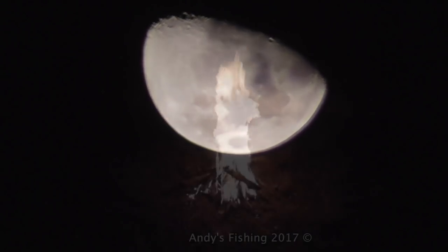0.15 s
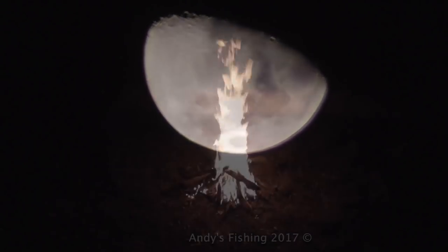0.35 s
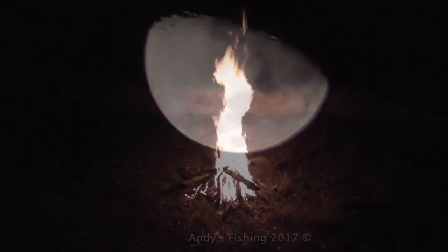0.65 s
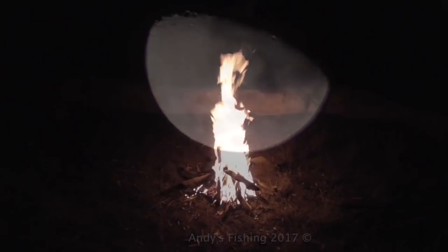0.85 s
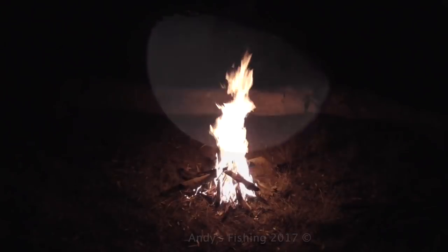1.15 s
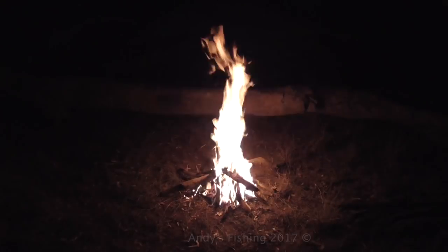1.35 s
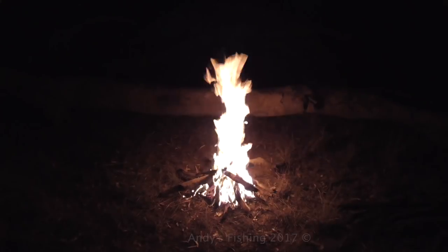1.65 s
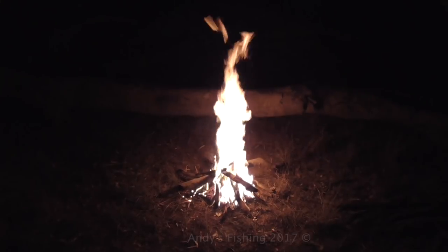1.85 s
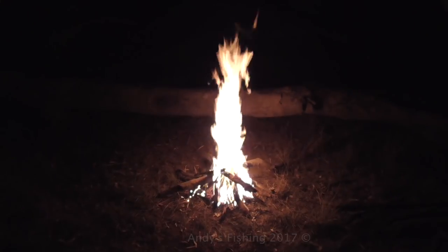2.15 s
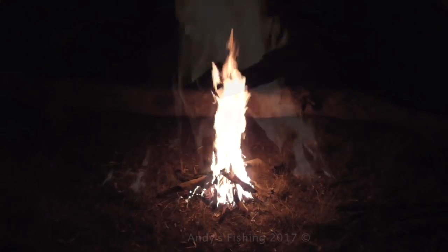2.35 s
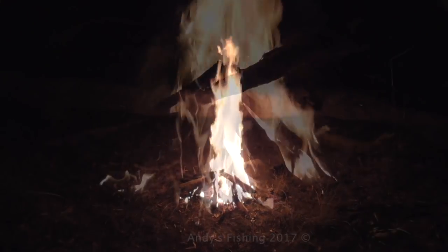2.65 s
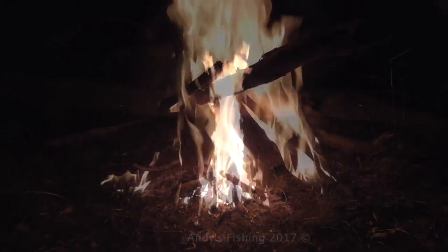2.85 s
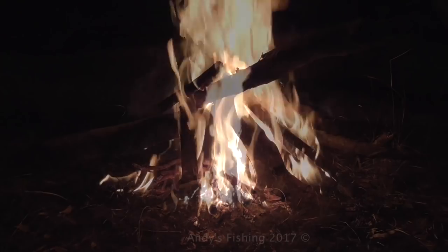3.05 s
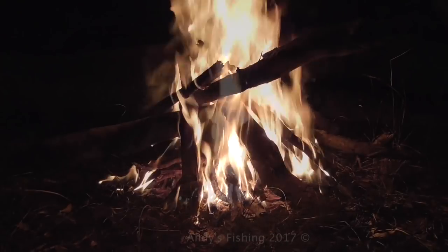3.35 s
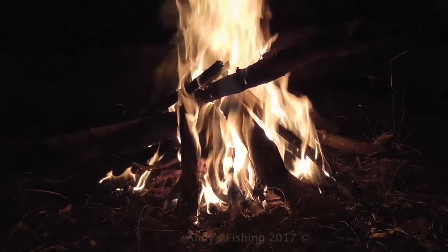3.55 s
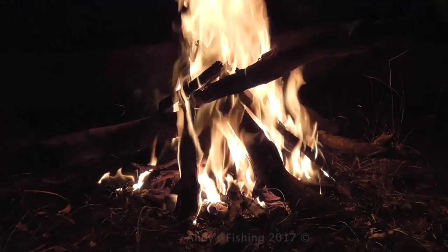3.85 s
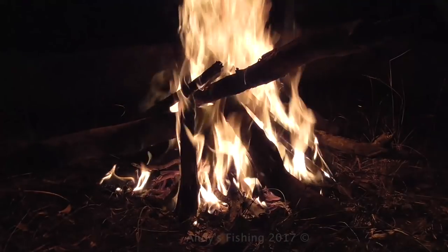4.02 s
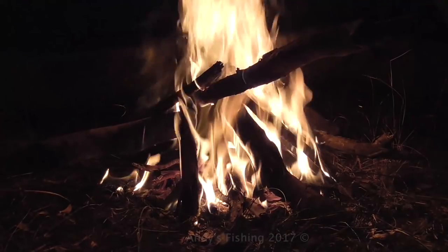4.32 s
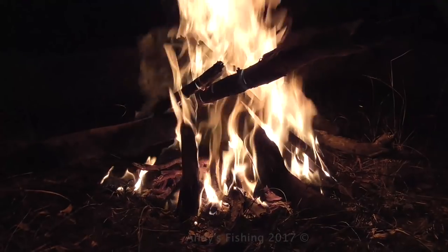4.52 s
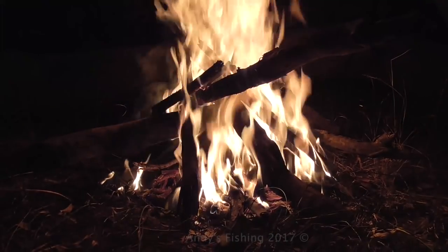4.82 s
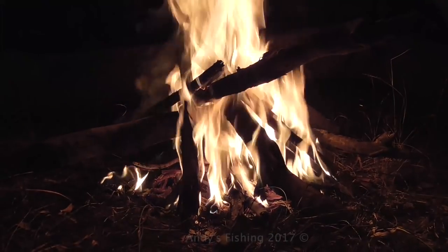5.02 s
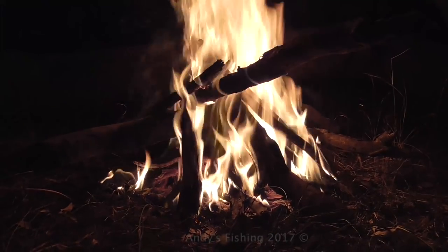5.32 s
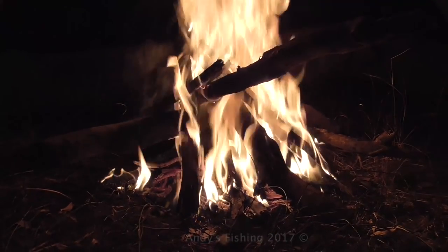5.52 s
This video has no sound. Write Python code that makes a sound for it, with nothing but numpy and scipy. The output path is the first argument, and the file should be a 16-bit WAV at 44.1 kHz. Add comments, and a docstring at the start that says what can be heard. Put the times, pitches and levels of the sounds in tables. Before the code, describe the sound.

Outdoors at night, thin cricket notes and a merged chorus open very quietly with a faint hollow drone. A high pulsed trill and near falling chirps join, swelling over the first second as a small fire fades in. From about 2.6 seconds the listening point cross-fades beside the fire: low fluttering roar, sizzle and crackles slightly right, crickets receding, one sharp pop at 4 seconds.

```python
"""Crickets in the dark first: thin held notes, a merged chorus and a faint hollow drone, with a fire faint behind.
A high pulsed trill and a near cricket's falling chirps join: wing strokes drawn as pitch-swept sines.
The listening spot cross-fades from the dark to a few steps from a campfire of sticks, then right beside it.
Flames flutter and roar and wood sizzles (coloured noise); twigs tick and cells crackle (resonant noise bursts).
One steam pocket bursts with a sharp pop: a pressure pulse and the decaying ring of the stick."""
import sys
import numpy as np
from scipy import signal
from scipy.fft import rfft, irfft, next_fast_len
from scipy.io import wavfile
from scipy.ndimage import uniform_filter1d, map_coordinates

SR = 44100
rng = np.random.default_rng(int(sys.argv[2]) if len(sys.argv) > 2 else 0)


def persist_wave(psi):
    """Save psi, clipped to +-1, as 16-bit WAV."""
    counts = np.round(np.clip(psi, -1, 1) * 32767).astype(np.int16)
    wavfile.write(sys.argv[1], SR, np.atleast_2d(counts).T)


N = 250488
T = np.arange(N) / SR
TOP_HZ = 15500

# cross-fades from dark to few steps, and from few steps to beside the fire: start_s, end_s
APPROACH_S, CLOSE_IN_S = (0.185, 1.324), (2.598, 3.477)

# layer levels at the three spots: dark_db, few_steps_db, beside_db
CHORUS_DB = (-49.5, -40.5, -45)
CROWD_DB = (-53, -42.5, -48.5)
MURMUR_DB = (-56, -50.5, -52.5)
ROAR_DB = (-69, -43, -34)
SIZZLE_DB = (-58, -54, -53.5)
CHIRP_DB = (-55.5, -34.5, -50.5)
DRONE_DB = -49  # dark spot only

# held notes of tree crickets: start_s, end_s, pitch_hz, level_db, left_over_right_db, pulse_depth (0-1)
HELD_NOTES = [(-.1, .93, 3818, -52.5, 4, 0.5), (-.1, .93, 3673, -56, -1, 0.67),
              (2.208, 2.777, 3744, -52.5, -3.5, 0.26), (2.21, 2.781, 3570, -57, -12.5, 0.57)]
# spectrum of the furthest crickets: freq_hz, density_db (per Hz, relative)
CHORUS_SPECTRUM = [(2700, -48.5), (3100, -19.5), (3370, -3), (3520, -10), (3750, -8), (3950, -8),
                   (4200, 1.5), (4450, 5.5), (4750, 3.5), (4950, -7), (5200, -27.5), (5700, -42.5)]
# spectrum of the night air: freq_hz, density_db (per Hz, relative)
MURMUR_SPECTRUM = [(100, -1.5), (300, 1.5), (620, 3), (950, -1), (1200, -8), (1490, 5), (1720, -7),
                   (2100, -4.5), (2700, -11), (3200, -6), (5500, -17.5), (9000, -27.5)]
# spectrum of the hollow drone: freq_hz, density_db (per Hz, relative)
DRONE_SPECTRUM = [(250, -27.5), (450, 5.5), (640, -10), (860, 3), (1150, -13.5), (1900, -34.5), (2230, -2),
                  (2800, -24), (3200, 0), (4500, -1), (6000, -27)]
# left-right likeness of the night sounds: freq_hz, correlation (0-1)
NIGHT_ALIKE = [(200, 0.047), (700, 0.324), (4500, 0.362)]

# flame roar heard beside the fire: freq_hz, density_db (per Hz, relative)
NEAR_ROAR_SPECTRUM = [(20, -36.5), (40, -14.5), (70, -5.5), (130, 1.21), (175, 1), (260, -7), (370, -3),
                      (500, -13), (750, -20.5), (1100, -27), (2000, -42), (5000, -69.5)]
# flame roar heard from the other two spots: freq_hz, density_db (per Hz, relative)
FAR_ROAR_SPECTRUM = [(20, -31), (60, -7.5), (120, -5), (180, 1.5), (250, -1), (350, -7), (450, -15.5),
                     (650, -16), (1100, -23.5), (3000, -43.5)]
# boiling sap: freq_hz, density_db (per Hz, relative)
SIZZLE_SPECTRUM = [(1500, -15), (2700, -9.5), (5400, -5.5), (6200, -1), (7300, -3.5), (9000, 0),
                   (11500, -2), (13500, -3), (15500, -11.5)]
# left-right likeness of the fire: freq_hz, correlation (0-1)
FIRE_ALIKE = [(150, 1), (350, 0.927), (700, 0.846), (2000, 0.12), (12000, 0.0134)]
# moments when the flames flare up or sink back: time_s, swell_db
PUFFS = [(1.331, -10.5), (2.47, -9.5), (3.52, -1), (4.15, 0.5), (4.26, -3), (4.545, 3.5), (4.59, -3.5),
         (5.229, 7), (5.53, 3)]
PUFF_HALF_WIDTH_S = 0.01495
TICK_DB, TICK_SPREAD_DB = 6.5, 6.5  # faintest tick over the sizzle; strongest over faintest

# phrases of the high cricket: start_s (after the lead-in), length_s, level_db (relative)
TRILL_PHRASES = [(0.264, 0.1923, -41.5), (0.728, 0.134, -44.5), (0.878, 0.0764, -49.5),
                 (1.041, 0.0244, -50), (1.171, 0.0704, -47), (1.333, 0.094, -45.5), (1.522, 0.092, -46.5),
                 (1.736, .084, -46), (1.951, 0.082, -46), (2.149, 0.0896, -43.5), (2.362, 0.0857, -44),
                 (2.602, 0.092, -45.5), (4.639, 0.087, -60.5), (4.854, 0.087, -61), (5.079, .1, -61.5),
                 (5.322, 0.104, -59)]
# scrape of its file around the tone: freq_hz, density_db (per Hz, relative)
RASP_SPECTRUM = [(5000, -40.5), (5900, 10), (6500, -4), (7300, 7), (8000, -9), (9500, -24.5), (13000, -17),
                 (15000, -27.5)]
RASP_DB = -16.5
TRILL_SWELL_S = 0.075  # soft lead-in of a phrase

# bouts of the nearest cricket: start_s, end_s, chirp_period_s, strokes_per_chirp, level_db (relative)
CHIRP_BOUTS = [(.449, .54, .066, 1, 0), (.611, 1.4, .177, 3, 0), (1.493, 1.55, .177, 2, 1),
               (1.611, 1.83, .061, 1, 1), (1.906, 2.7, .179, 3, 0), (2.757, 2.98, .062, 1, 1),
               (3.034, 5.6, .177, 3, 0)]
STROKE_GAP_S, STROKE_SPREAD_DB = 0.04, 0.6  # within a chirp; from stroke to stroke
STROKE_S, OPENING_STROKE_S = 0.082, 0.05  # median lengths; a multi-stroke chirp opens with the quicker one
STROKE_BEND = 0.28  # the tone drops fast at first, then levels out

# bursting wood cells: time_s, level_db (relative), ring_hz, ring_sharpness, knock_db (relative)
CRACKLES = [(1.102, -35.5, 9000, 2, 5), (1.3105, -32.5, 9140, 4.1, -18.5), (2.1314, -32.5, 9000, 2.6, -0.5),
            (2.2136, -25.5, 11750, 2.9, -31), (3.172, -35, 8400, 2.5, -19.5),
            (3.1963, -32.5, 11500, 3.1, -17.5), (3.226, -30, 12500, 2.06, -20),
            (3.338, -41.5, 8150, 2.7, -20), (3.3464, -19.5, 10280, 2.7, -7.5),
            (3.434, -21.5, 10830, 4.3, -26), (3.512, -39, 9800, 6, -26), (3.6363, -18, 9100, 4.5, -2),
            (3.6825, -24, 8400, 1.12, -6), (3.8776, -23.5, 9800, 2.1, -4.5), (3.925, -34, 9800, 3, -20.5),
            (3.968, -37.5, 11100, 4, -20), (4.006, -31, 9800, 2, -26), (4.0081, -28, 8900, 3.9, -26),
            (4.033, -27.5, 11000, 3.6, -21), (4.1985, -28, 8820, 9, -25.5), (4.2265, -33, 10000, 3.5, 1),
            (4.3599, -28, 6960, 1.62, 7), (4.4175, -29.5, 8920, 4.8, -2.5), (4.471, -27, 8500, 2.4, 4.5),
            (4.6343, -31, 9560, 6.8, -6.5), (4.728, -26.5, 6900, 2.06, -12),
            (4.9412, -28, 10450, 6.7, -5.5), (5.05, -39.5, 10100, 4, -20.5), (5.108, -39, 10300, 4, -20),
            (5.202, -27, 8300, 1.8, -15), (5.2075, -32.5, 11000, 4.6, -20.5),
            (5.241, -38.5, 9200, 4.1, -20), (5.404, -37, 10500, 4, -20.5), (5.4199, -34, 9300, 3, -8),
            (5.6257, -20, 9000, 4.1, -27)]
# colour shared by all snaps: freq_hz, gain_db
SNAP_COLOUR = [(2500, -2), (4500, 2.5), (5500, 4), (6600, -4.5), (8200, -1), (11000, -0.5), (13300, -4.5),
               (15500, -10)]
# ringing modes of the stick that pops: mode_hz, level_db (relative), t60_s
STICK_MODES = [(353, -12, 0.0154), (726, -39, 0.0051), (4310, -34, 0.015), (5450, -3, 0.00137),
               (9100, -12.5, 0.00307), (13230, -22.5, 0.00265)]


def amp(db):
    """Decibels to gain."""
    return 10 ** (np.asarray(db) / 20)


def unit(x):
    """Scale to rms 1."""
    return x / np.sqrt(np.mean(x ** 2) + 1e-20)


def along(points, hz):
    """Interpolate (Hz, value) points on a log-frequency axis."""
    freq_hz, value = np.transpose(points)
    return np.interp(np.log(hz + 1), np.log(freq_hz), value)


def wobble(rate_hz):
    """A smooth random curve with rate_hz knots a second."""
    knots = rng.standard_normal(int(N * rate_hz / SR) + 4)
    return map_coordinates(knots, [T * rate_hz])


def filtered(x, response):
    """Apply a response of frequency to x."""
    size = next_fast_len(N + 8192)
    freq_hz = np.fft.rfftfreq(size, 1 / SR)
    return irfft(rfft(x, size) * response(freq_hz), size)[..., :N]


def pan(left_over_right_db):
    """Channel gains for a left-right level difference."""
    return amp(np.array([[left_over_right_db], [-left_over_right_db]]) / 2)


def add(track, time_s, sound):
    """Mix a sound into a track at time_s, clamped to the track's ends."""
    i = int(np.clip(round(time_s * SR), 0, N - 1))
    track[..., i:i + sound.shape[-1]] += sound[..., :N - i]


def spots():
    """Gain of each of the three spots over time, one row per spot."""
    near, close = (np.clip((T - start_s) / (end_s - start_s), 0, 1)
                   for start_s, end_s in (APPROACH_S, CLOSE_IN_S))
    return np.array([1 - near, near * (1 - close), close])


def level(spot_db):
    """Gain over time of a layer whose three spots add in power."""
    return np.linalg.norm(amp(spot_db)[:, None] * spots(), axis=0)


def rush(spectrum, alike, grain_db=0):
    """Coloured stereo noise of rms 1; grain_db breaks it into tiny bursts."""
    pair = rng.standard_normal((2, N)) * amp(grain_db * wobble(900))

    def mid_side_response(hz):
        # the mid-side balance sets the left-right correlation
        angle = np.arccos(np.clip(along(alike, hz), -1, 1)) / 2
        return amp(along(spectrum, hz)) * [np.cos(angle), np.sin(angle)]

    mid, side = filtered(pair, mid_side_response)
    return unit(np.array([mid + side, mid - side]))


def scatter(x, t60_s):
    """Diffuse reflections from ground and trees, independent on left and right."""
    t = np.arange(SR // 2) / SR
    tail = rng.standard_normal((2, len(t))) * amp(-60 * t / t60_s)
    tail = tail / np.linalg.norm(tail, axis=1, keepdims=True)
    return signal.fftconvolve(np.atleast_2d(x), tail, axes=1)[:, :N]


def tree_crickets(edge_s=0.047, stroke_rate_hz=110, waver_hz=22):
    """Thin held notes, finely pulsed by the wings and blurred by the foliage."""
    out = np.zeros((2, N))
    for start_s, end_s, pitch_hz, level_db, side_db, depth in HELD_NOTES:
        gate = np.clip(np.minimum(T - start_s, end_s - T) / edge_s, 0, 1)
        pulse = 1 + depth * np.sin(2 * np.pi * stroke_rate_hz * T + wobble(40))
        hz = pitch_hz + waver_hz * wobble(200)
        tone = pulse * np.sin(2 * np.pi * np.cumsum(hz) / SR)
        blurred = unit(tone + 0.5 * scatter(tone, t60_s=0.174))
        out += amp(level_db) * gate * blurred * pan(side_db)
    return out


def far_chorus():
    """The furthest crickets merge into a gently fluctuating band of noise."""
    chorus = amp(0.87 * wobble(11)) * rush(CHORUS_SPECTRUM, NIGHT_ALIKE)
    return level(CHORUS_DB) * chorus * pan(0.12)


def wing_stroke(top_hz, fall, length_s, fade_db):
    """The file slows as the wing closes, so the tone falls in a curve and fades to a softer tail."""
    u = np.arange(int(length_s * SR)) / (length_s * SR)
    hz = top_hz * (1 - fall * (u + STROKE_BEND * u * (1 - u)))
    gate = np.minimum(np.minimum(u, 1 - u) / 0.11, 1)
    tone = np.sin(2 * np.pi * np.cumsum(hz) / SR + 2 * np.pi * rng.random())
    return tone * gate * amp(-fade_db * np.minimum(2 * u, 1))


def cricket_crowd(count=360):
    """Crickets in the middle distance: scattered short falling strokes, spread left to right."""
    crowd = np.zeros((2, N))
    for k, (shift, loud, tune, stretch, side) in enumerate(rng.standard_normal((count, 5))):
        stroke = wing_stroke(4830 * (1 + 0.01606 * tune), fall=0.135,
                             length_s=0.052 * np.exp(0.3 * stretch), fade_db=2)
        add(crowd, (k + 0.37 * shift) * T[-1] / count, amp(0.81 * loud) * stroke * pan(8 * side))
    return level(CROWD_DB) * unit(crowd + amp(2) * scatter(crowd, t60_s=0.05))


def night_air():
    """A murmur of fluctuating coloured noise."""
    murmur = amp(1.46 * wobble(20)) * rush(MURMUR_SPECTRUM, NIGHT_ALIKE)
    return level(MURMUR_DB) * murmur * pan(-1.44)


def hollow_drone():
    """A faint drone of noise in a few narrow humps, heard only out in the dark."""
    return amp(DRONE_DB) * spots()[0] * rush(DRONE_SPECTRUM, NIGHT_ALIKE)


def flames():
    """Turbulent flames roar in quick puffs, fuller from close by, while sap boils out in tiny bursts."""
    dark, steps, beside = amp(ROAR_DB)[:, None] * spots()
    near_roar = beside * rush(NEAR_ROAR_SPECTRUM, FIRE_ALIKE)
    far_roar = np.hypot(dark, steps) * rush(FAR_ROAR_SPECTRUM, FIRE_ALIKE)
    flare_db = sum(swell_db * np.exp(-((T - time_s) / PUFF_HALF_WIDTH_S) ** 2) for time_s, swell_db in PUFFS)
    flutter_db = 0.82 * wobble(16) + 1.605 * wobble(70)
    roar = amp(flare_db + flutter_db) * (near_roar + far_roar)
    sizzle_flutter = amp(0.88 * wobble(15) + 0.82 * wobble(60))
    sizzle = level(SIZZLE_DB) * sizzle_flutter * rush(SIZZLE_SPECTRUM, FIRE_ALIKE, grain_db=1.0)
    return roar * pan(-4.0) + sizzle * pan(-1.04)


def burst(centre_hz, sharpness, t60_s, rise_s=0.000333, size=1024):
    """A tearing puff of noise through one broad resonance, with peak 1."""
    t = np.arange(size) / SR
    hz = np.fft.rfftfreq(size, 1 / SR) + 1
    puff = rng.standard_normal(size) * amp(-60 * t / t60_s) * (1 - np.exp(-t / rise_s))
    sound = irfft(rfft(puff) / (1 + 1j * sharpness * (hz / centre_hz - centre_hz / hz)))
    return sound / abs(sound).max()


def ticks(count=190):
    """Bark and twigs tick softly at random, most just above the sizzle; they carry only a short way."""
    out = np.zeros(N)
    for when, strength, colour in rng.random((count, 3)):
        tick_db = TICK_DB + TICK_SPREAD_DB * strength ** 3
        tick = burst(centre_hz=8000 + 3500 * colour, sharpness=6.3, t60_s=0.0072)
        add(out, when * T[-1], amp(tick_db) * tick)
    distance_gain = amp(-5 * (1 - spots()[2]))
    return level(SIZZLE_DB) * distance_gain * (out + amp(0.5) * scatter(out, t60_s=0.038)) * pan(-2)


def trill_phrase(length_s, stroke_rate_hz, pitch_hz=6550, flat_hz=300, fade_s=0.0074, rasp_hz=70,
                 soft_db=-26, jitter_strokes=0.125):
    """Tone and force of rapid wing strokes, each a tiny downward sweep; starts soft and slightly flat."""
    t = np.arange(SR // 2) / SR
    effort = np.clip(t / TRILL_SWELL_S, 0, 1)
    release = np.clip((length_s + TRILL_SWELL_S - t) / fade_s, 0, 1)
    jitter = jitter_strokes * wobble(58.5)[:len(t)]
    stroke, cycle = np.divmod(t * stroke_rate_hz + 1 + rng.random() + jitter, 1)
    rasp = unit(uniform_filter1d(rng.standard_normal(len(t)), size=24))
    sweep_hz = 480 * (0.5 - cycle)
    hz = pitch_hz + sweep_hz - flat_hz * (1 - effort) + rasp_hz * rasp
    # every stroke sets the wing ringing afresh
    phase = np.cumsum(hz) / SR + rng.random(len(t))[stroke.astype(int)]
    force = amp(soft_db * (1 - effort)) * release * unit(np.sin(np.pi * cycle) ** 3)
    return np.array([force * np.sin(2 * np.pi * phase), force])


def trilling():
    """The high cricket's uneven strokes, smeared together by the grass; its file scrapes around the tone."""
    tone_and_force = np.zeros((2, N))
    for start_s, length_s, level_db in TRILL_PHRASES:
        stroke_rate_hz = 90 * np.exp(0.0239 * rng.standard_normal())
        add(tone_and_force, start_s - TRILL_SWELL_S, amp(level_db) * trill_phrase(length_s, stroke_rate_hz))
    tone, force = tone_and_force * amp(1.6 * wobble(110))
    echo = amp(-6) * scatter(tone, t60_s=0.035) + amp(-13) * scatter(tone, t60_s=0.25)
    scrape = uniform_filter1d(force, size=300) * rush(RASP_SPECTRUM, NIGHT_ALIKE)
    return (amp(-1.5) * (tone + echo) + amp(RASP_DB) * scrape) * pan(2.75)


def near_cricket():
    """One cricket close by, its falling strokes in triplets or in slower single strokes."""
    near = np.zeros(N)
    for start_s, end_s, period_s, strokes, level_db in CHIRP_BOUTS:
        for chirp_s in np.arange(start_s, end_s, period_s):
            for k in range(round(strokes)):
                tune, stretch, loud = rng.standard_normal(3)
                length_s = OPENING_STROKE_S if strokes > 1 and k == 0 else STROKE_S
                stroke = wing_stroke(5040 * (1 + 0.005 * tune), fall=0.225,
                                     length_s=length_s * np.exp(0.07 * stretch), fade_db=10.5)
                add(near, chirp_s + STROKE_GAP_S * k, amp(level_db + STROKE_SPREAD_DB * loud) * stroke)
    # the strokes sound beaded, their level flickering quickly
    near = near * amp(2.2 * wobble(170))
    return level(CHIRP_DB) * (near + amp(-7) * scatter(near, t60_s=0.035)) * pan(3)


def blast(time_s, rise_s=0.00005):
    """The pressure pulse of escaping steam: a spike and a slower swing back."""
    t = np.arange(SR // 10) / SR
    return (t / time_s - 1) * np.exp(-t / time_s) * (1 - np.exp(-t / rise_s))


def crackles(snap_t60_s=0.00259, knock_s=0.000205, knock_gain_db=9, delay_s=0.0008, lead_s=0.0018, lead_db=-17):
    """Each bursting cell gives a tiny warning tick, a bright snap and the duller knock of its steam."""
    out = np.zeros(N)
    for time_s, level_db, ring_hz, sharpness, knock_db in CRACKLES:
        snap = burst(ring_hz, sharpness, t60_s=snap_t60_s)
        warning = burst(ring_hz, sharpness, t60_s=snap_t60_s)
        add(out, time_s + delay_s, amp(level_db + 2.0) * snap)
        add(out, time_s + delay_s, amp(level_db + knock_db + knock_gain_db) * blast(knock_s))
        add(out, time_s - lead_s, amp(level_db + lead_db) * warning)
    out = filtered(out, lambda hz: amp(along(SNAP_COLOUR, hz)))
    return (out + amp(-7.0) * scatter(out, t60_s=0.028)) * pan(-2.1)


def pop(time_s=3.9952, blast_db=-0.5, blast_s=0.00035, splinter_db=-28, splinter_t60_s=0.061,
        spit_db=-24, spit_t60_s=0.01):
    """A steam pocket bursts: a pressure pulse, tearing fibres, a spit of steam, a brief ring of the split stick."""
    out = np.zeros(N)
    t = np.arange(SR // 10) / SR
    ring = sum(amp(level_db - 60 * t / t60_s) * np.sin(2 * np.pi * mode_hz * t)
               for mode_hz, level_db, t60_s in STICK_MODES)
    add(out, time_s, amp(blast_db) * blast(blast_s) + ring * (1 - np.exp(-t / 0.00005)))
    add(out, time_s, amp(splinter_db) * burst(centre_hz=4300, sharpness=2.8, t60_s=splinter_t60_s))
    add(out, time_s, amp(spit_db) * burst(centre_hz=11500, sharpness=0.87, t60_s=spit_t60_s))
    echo = amp(-16) * scatter(out, t60_s=0.03)
    return (out + echo) * pan(-4.5)


def scene():
    """Fire slightly to the right, insects and night air all around."""
    insects = tree_crickets() + far_chorus() + cricket_crowd() + trilling() + near_cricket()
    night = night_air() + hollow_drone()
    fire = flames() + ticks() + crackles() + pop()
    return insects + night + fire


def record(dry):
    """A very steep low-pass at TOP_HZ."""
    return filtered(dry, lambda hz: 1 / np.hypot(1, (hz / TOP_HZ) ** 80))


dry = scene()
out = record(dry)
persist_wave(out)
```